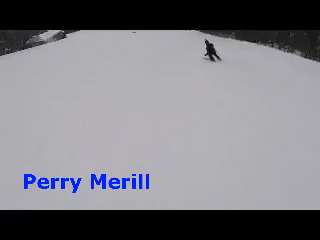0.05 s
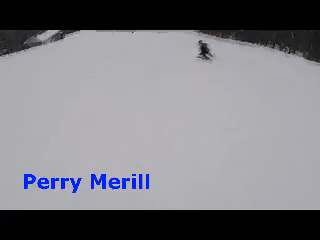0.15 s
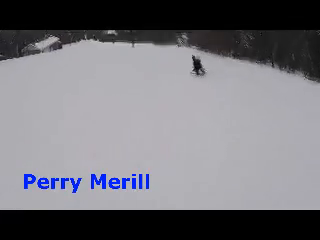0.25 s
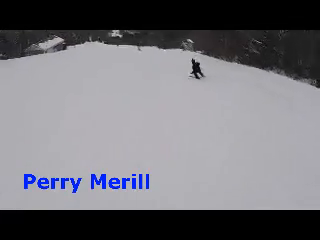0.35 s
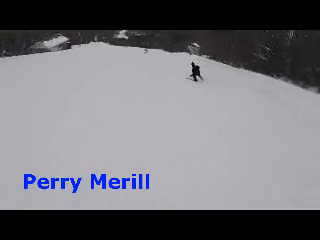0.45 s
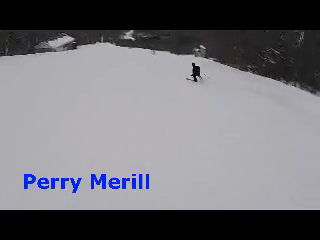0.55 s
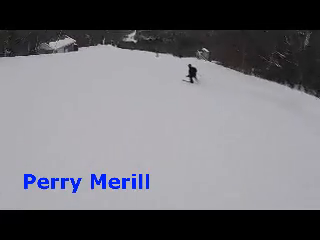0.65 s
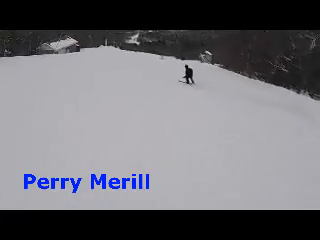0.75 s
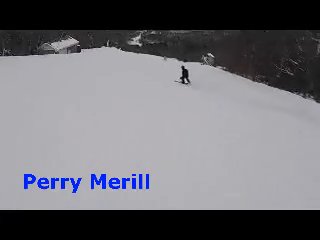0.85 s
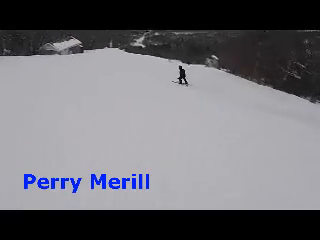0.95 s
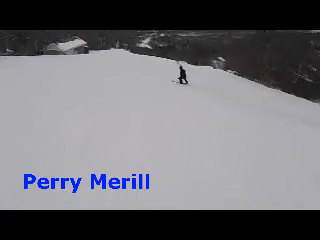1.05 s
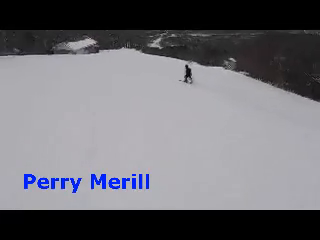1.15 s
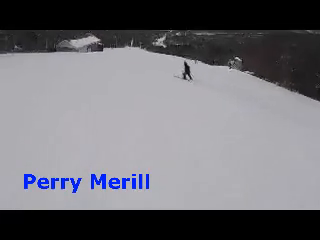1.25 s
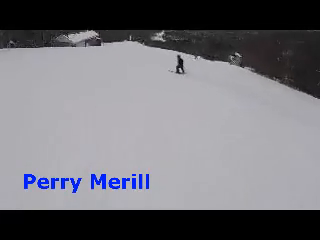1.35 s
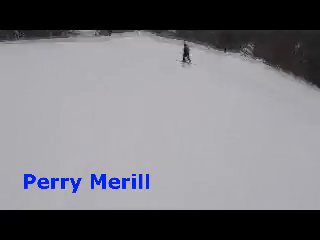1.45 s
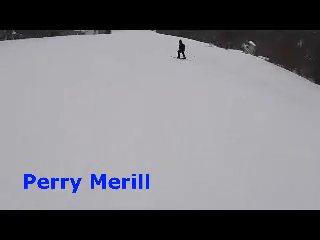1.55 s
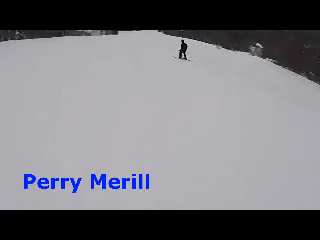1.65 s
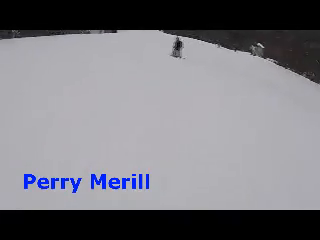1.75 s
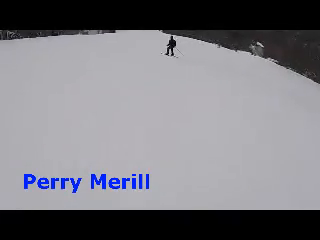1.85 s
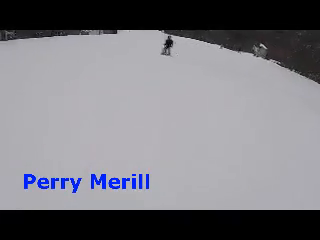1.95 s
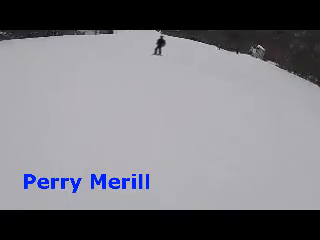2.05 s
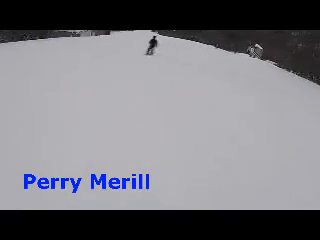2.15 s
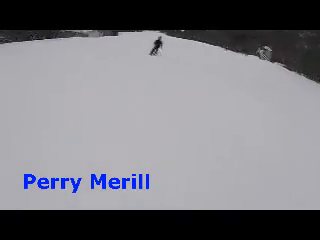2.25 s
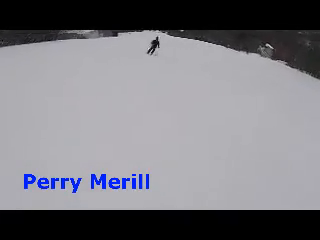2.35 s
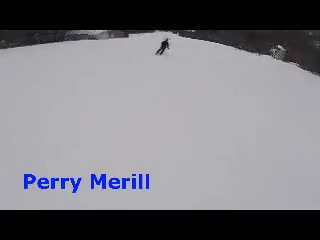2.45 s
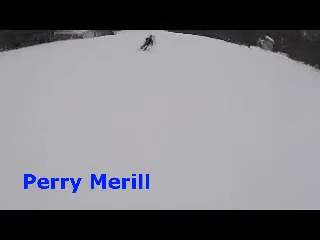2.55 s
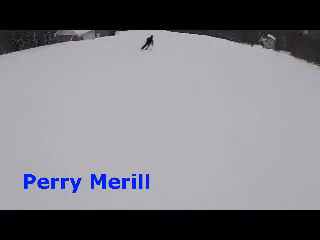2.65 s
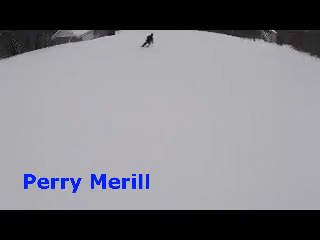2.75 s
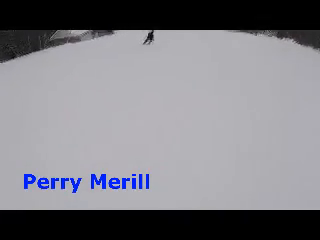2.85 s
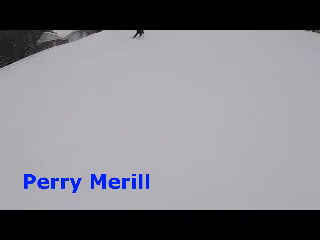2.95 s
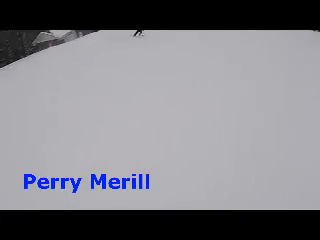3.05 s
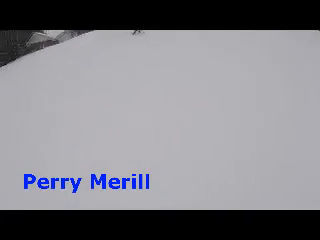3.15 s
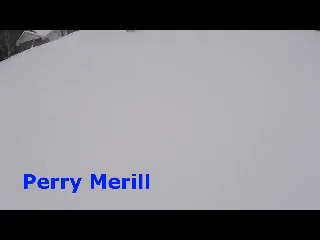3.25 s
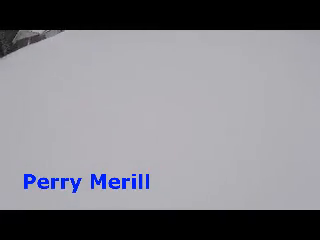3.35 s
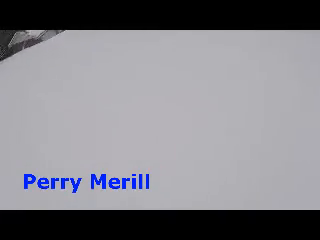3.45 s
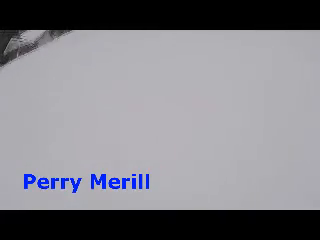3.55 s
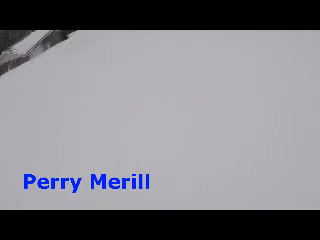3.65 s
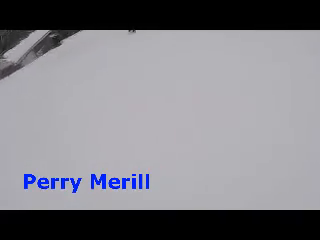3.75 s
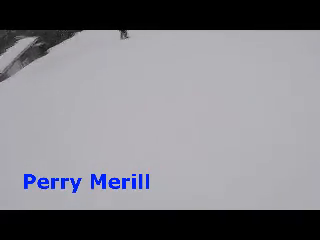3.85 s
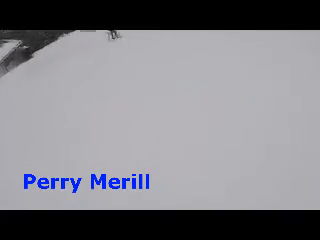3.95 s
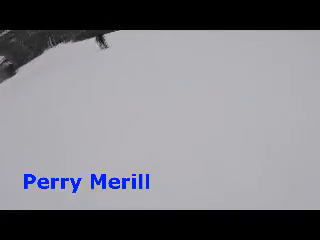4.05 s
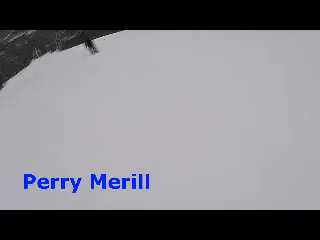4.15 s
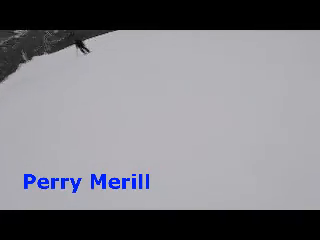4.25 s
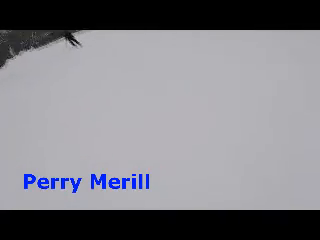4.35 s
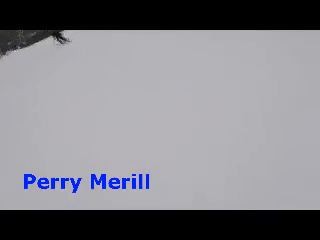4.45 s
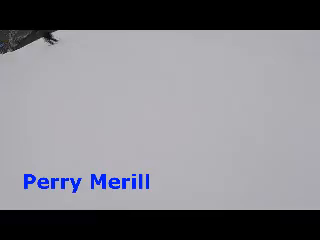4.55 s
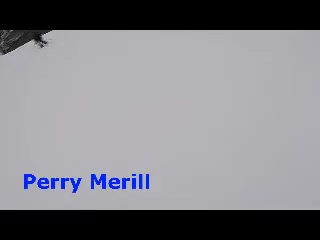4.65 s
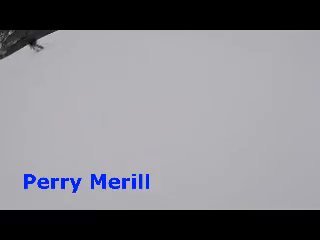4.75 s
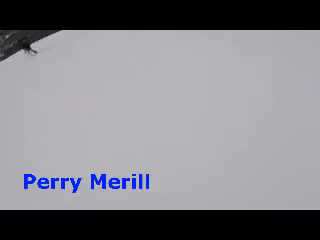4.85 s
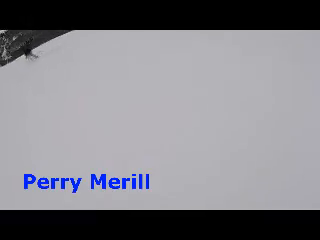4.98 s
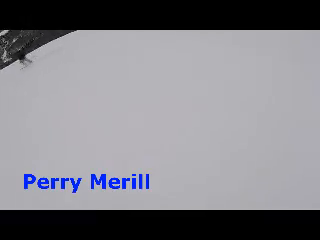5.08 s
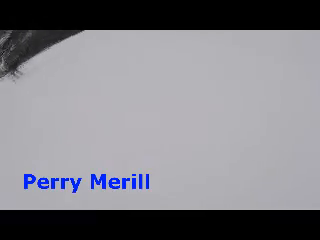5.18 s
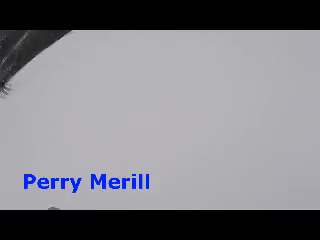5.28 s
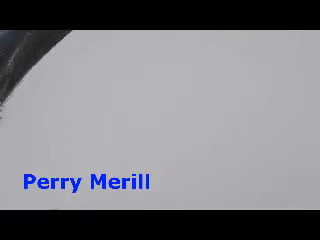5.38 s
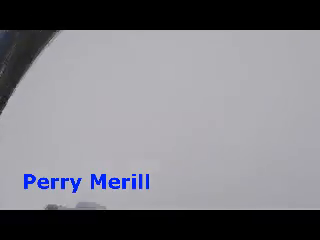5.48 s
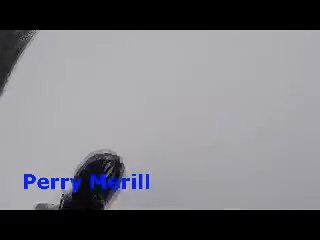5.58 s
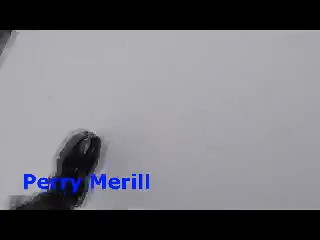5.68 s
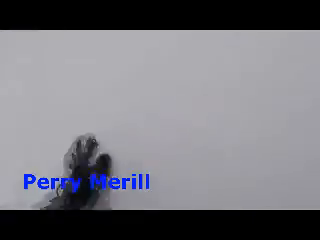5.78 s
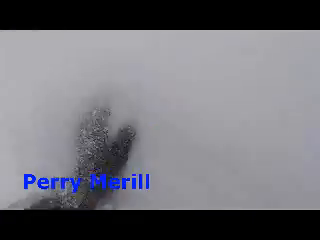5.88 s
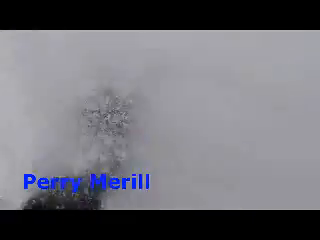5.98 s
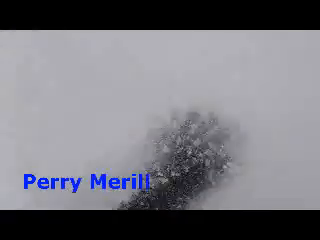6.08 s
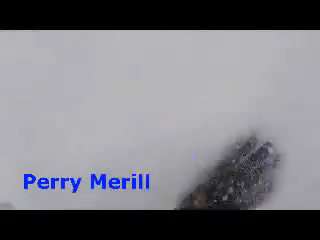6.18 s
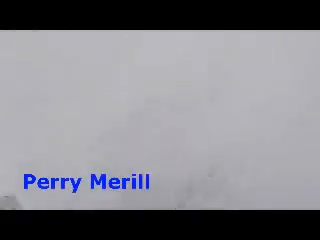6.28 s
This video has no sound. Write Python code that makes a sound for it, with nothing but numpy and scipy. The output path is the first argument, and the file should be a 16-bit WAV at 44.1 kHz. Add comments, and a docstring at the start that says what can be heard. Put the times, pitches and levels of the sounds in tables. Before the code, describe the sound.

A close microphone in a plastic case moves down an open snow slope. From the start, low gusts of wind buffet it in soft, bassy lumps, strong around 0.4-0.7, 1.4 and 2.3 seconds, with a faint airy rush. Beneath, skis thrum and crush grainy snow quietly; scraping swells near 0.4, 1.1 and 2.2 seconds. Small clumps tap the case now and then, clustered around 2.5-3.4. From 3.5 the scraping firms up, surging at 4.15 and 4.7, with more rushing air. A dull knock comes at 5.1, then the edges bite hard from 5.3 to 5.7, rough and hissing. At about 5.9 snow clumps start striking sharply; from 5.95 to 6.2 a dense volley of plasticky knocks, crunches and cracks overloads the microphone amid bright powder patter and ticking crumbs. It thins to scraping, wind and last weak taps by 6.3.

```python
"""Skiing down a groomed slope, heard by a microphone in a plastic case.
From the start, low noise in gusts is wind buffeting the case, with air rushing past above it. Random grains
in bands from thrum to fizz are skis crushing snow; turns swell their scraping and hissing, mostly harder later.
Single clumps of snow tap the case and make its resonances ring. At the end a hard turn throws up a spray:
powder patters, crumbs tick, and a volley of clumps overloads the microphone."""
import sys
import numpy as np
from scipy import signal
from scipy.fft import rfft, irfft, next_fast_len
from scipy.io import wavfile
from scipy.ndimage import uniform_filter1d

SR = 44100
rng = np.random.default_rng(int(sys.argv[2]) if len(sys.argv) > 2 else 0)


def digitize_waveform(pressure):
    """Quantize a signal to 16-bit integers and store it at the path in sys.argv[1].

    Rows of a 2-D input are taken as channels; values are limited to [-1, 1].
    """
    field = np.atleast_2d(pressure).T
    bounded = np.clip(field, -1, 1)
    quanta = np.round(bounded * 32767).astype(np.int16)
    wavfile.write(sys.argv[1], SR, quanta)


N = 278712   # samples, about 6.3 s

# Resonances of the case, from its ringing panel to the sharp crack of its corners: f/Hz, width/Hz, level/dB
PANEL = [(1367, 99, 8.5), (1600, 390, -3.5)]
CRUNCH = [(1630, 380, 7), (2360, 410, 2.6), (2648, 173, 5.3), (3030, 340, 0.64)]
CRACK = [(3776, 185, 6.5), (4610, 150, -2.5), (5040, 180, -5.5), (6310, 300, -11.5), (7450, 1400, -16.5)]


def from_db(db):
    """Decibels to amplitude gain."""
    return 10 ** (np.asarray(db) / 20)


def rms_one(x):
    """Scale to unit rms."""
    return x / np.sqrt(np.mean(x ** 2) + 1e-20)


def in_time(rows):
    """Interpolate each column of a curve over t/s, sample by sample."""
    s, *columns = np.transpose(rows)
    return [np.interp(np.arange(N) / SR, s, column) for column in columns]


def drift(rate_hz):
    """Slow random wavering with a spread of 1: noise through two equal low-pass poles."""
    step = 40   # samples between points of the slow curve
    pole = np.exp(-2 * np.pi * rate_hz * step / SR)
    noise = rng.standard_normal(N // step + 2002)
    slow = signal.lfilter([1], [1, -2 * pole, pole ** 2], noise)[2000:]   # skip the filter's start
    return np.interp(np.arange(N) / step, np.arange(len(slow)), rms_one(slow))


def coloured(x, spectrum):
    """Filter a sound by a spectrum that falls away steeply past its ends; unit rms."""
    hz, db = np.transpose(spectrum)
    size = next_fast_len(N)
    octave = np.log2(np.maximum(np.fft.rfftfreq(size, 1 / SR), 1))
    octaves_outside = np.abs(octave - np.clip(octave, np.log2(hz[0]), np.log2(hz[-1])))
    gain_db = np.interp(octave, np.log2(hz), db) - 60 * octaves_outside
    return rms_one(irfft(rfft(x, size) * from_db(gain_db), size)[:N])


def resonate(x, modes):
    """Ring two-pole resonances in parallel, with alternating signs."""
    out = 0
    for k, (hz, width_hz, db) in enumerate(modes):
        r = np.exp(-np.pi * width_hz / SR)
        poles = [1, -2 * r * np.cos(2 * np.pi * hz / SR), r * r]
        gain = (-1) ** k * from_db(db) * (1 - r * r) / 2
        out = out + gain * signal.lfilter([1, 0, -1], poles, x)
    return out


def grains(per_s, spread_db, smooth):
    """Snow crystals breaking at random, of uneven size, over an even rush."""
    sizes = from_db(spread_db * np.minimum(rng.exponential(1, N), 4))
    signed = sizes * rng.choice([-1, 1], N)
    breaks = rng.random(N) < per_s / SR
    return rms_one(signed * breaks) + smooth * rng.standard_normal(N)


def swell(s, rise_s, fall_s):
    """A smooth bell-shaped rise to 1 at time s, and a smooth fall."""
    t = np.arange(N) / SR - s
    return np.exp(-(t / np.where(t < 0, rise_s, fall_s)) ** 2)


def with_swells(base, swells):
    """Level in dB of a steady curve with swells (s, dB, rise s, fall s) added in power."""
    base_db, = in_time(base)
    power = from_db(base_db) ** 2
    for s, db, rise_s, fall_s in swells:
        power = power + (from_db(db) * swell(s, rise_s, fall_s)) ** 2
    return 10 * np.log10(power)


def wind():
    """Large eddies press on the case in low lumps; smaller ones rush past above them."""
    # Steady buffeting of the case, before wavering and trim: t/s, level/dB
    breeze = [(0, -41), (.15, -36), (.55, -37), (.95, -34.5), (1.5, -38.5), (1.75, -42.5), (2.1, -36),
              (2.35, -37.5), (2.95, -38), (3.08, -45.5), (3.25, -36.5), (3.65, -41), (4.1, -36.5),
              (4.7, -41), (5.45, -33), (6.32, -35)]
    # Single gusts on top of it: t/s, level/dB
    gusts = [(.33, -34), (.42, -28), (.65, -28), (.81, -33), (1.2, -33.5), (1.33, -31), (1.44, -28.5),
             (2.258, -27), (4.19, -30), (4.42, -36), (5.33, -30), (5.59, -29), (5.96, -26), (6.05, -26),
             (6.12, -28.5)]
    # Air rushing past with the speed of the run, before trim: t/s, level/dB
    airstream = [(0, -53.5), (1.1, -48), (1.45, -46), (1.85, -51), (2.48, -46.5), (2.85, -52),
                 (3.12, -43.5), (3.4, -46), (3.75, -43), (4.5, -43), (4.8, -37.5), (5.03, -40.5),
                 (5.17, -50), (5.41, -34.5), (5.78, -46.5), (6.06, -32), (6.32, -66)]
    # Spectra of the buffeting and of the rush: f/Hz, relative density/dB
    buffet_spectrum = [(8.8, -40), (15, 0.5), (56, 3), (98, -8), (130, -37.5), (220, -120)]
    rush_spectrum = [(66, -31), (112, 4), (162, -2), (245, -6.5), (320, -20), (540, -120)]
    gust_rise_s, gust_fall_s = 0.046, 0.038

    buffet_db = with_swells(breeze, [(s, db, gust_rise_s, gust_fall_s) for s, db in gusts])
    eddies = coloured(rng.standard_normal(N), buffet_spectrum)
    strength = np.sqrt(uniform_filter1d(eddies ** 2, size=4000))
    steady_eddies = eddies / strength   # evened out, so that the gusts set the level
    buffet = from_db(buffet_db + 0.38 + 1.4 * drift(18)) * steady_eddies

    rush_db, = in_time(airstream)
    rush = from_db(rush_db - 0.57) * coloured(rng.standard_normal(N), rush_spectrum)
    return buffet + rush


def skis():
    """The boards thrum while base and edges crush the snow; a shared chatter wavers their scraping."""
    # The skis running flat between turns, before trim and wavering: t/s, scrape level/dB
    glide = [(0, -55.5), (.8, -47.5), (1.3, -50), (1.75, -53.5), (2.4, -49), (2.85, -52.5), (3.25, -46),
             (3.85, -45.5), (4.4, -40.5), (4.88, -40), (5.05, -45), (5.58, -40), (5.83, -48), (6.32, -46)]
    # Pushes on the edges, each a swell of scraping: peak t/s, scrape level/dB, rise/s, fall/s
    turns = [(.39, -48.5, 0.09, 0.43), (1.12, -43.5, 0.21, .12), (2.21, -49, 0.25, 0.084),
             (2.47, -54, 0.068, 0.052), (2.95, -49.5, .04, 0.047), (3.51, -43, 0.042, 0.076),
             (4.15, -36.5, 0.096, 0.07), (4.689, -34.5, 0.065, 0.093), (5.33, -30, 0.089, .07),
             (5.469, -29, 0.12, 0.074), (5.67, -29, 0.043, 0.057), (5.879, -33.5, 0.02, 0.046),
             (6.15, -31.5, 0.25, .12)]
    # Tone from soft powder to hard-packed snow, before trim, over the scrape:
    # t/s, thrum/dB, edge bite/dB, powder hiss/dB
    snow = [(0, 3, -8, 1.5), (.45, 0.5, -22.5, 1), (1.15, -0.5, -14.5, -1), (1.8, 3.5, -10, -0.5),
            (2.3, 3.5, -13, -2), (2.9, 0, -2, 2.5), (3.25, -3, -12, -9), (3.5, -0.5, -9, -3.5),
            (3.75, -0.5, -9.5, -9.5), (4.35, -1.5, -6, -5.5), (4.98, 1, -6.5, -7.5), (5.35, -2.5, -2, -2.5),
            (5.7, -2.5, -3, -2), (6.32, -10, -4.5, -4)]
    # Spectra of the layers, from the boards up to the finest crystals: f/Hz, relative density/dB
    thrum_spectrum = [(140, -32), (235, -3), (326, 0.5), (450, -5), (511, -4), (592, -6), (689, -6),
                      (835, -2), (950, -16.5), (1240, -45), (2090, -120)]
    scrape_spectrum = [(550, -38), (930, -9.5), (1060, -4), (1160, -6), (1340, -1), (1450, -2),
                       (1580, -4.5), (1800, -11.5), (2340, -24), (3960, -120)]
    bite_spectrum = [(940, -34), (1600, -0.5), (1880, 0.5), (2210, 3.5), (2390, -2.5), (2640, -0.5),
                     (2800, -23), (3640, -43), (6160, -120)]
    hiss_spectrum = [(1470, -34), (2500, -3.5), (2640, 1.5), (2870, 0.5), (3050, 2.5), (3350, -5),
                     (3640, 1.5), (3860, -6.5), (4160, -12.5), (4450, -11.5), (5100, -19.5), (5700, -42.5),
                     (11600, -120)]
    fizz_spectrum = [(4800, -46), (5700, -12), (6350, 4.5), (6750, 1.5), (7500, -5), (8400, -7),
                     (9400, -31.5), (12000, -73.5)]
    # The skis flexing under a hard turn: f/Hz, width/Hz, level/dB
    flex = [(301, 85, 0)]

    scrape_db = with_swells(glide, turns)
    thrum_db, bite_db, hiss_db = in_time(snow)
    chatter_db = 1.25 * drift(30)

    def rubbing(level_db, source, spectrum):
        """One layer of the scraping, wavering on its own over uneven snow."""
        return from_db(level_db + 0.5 * drift(27)) * coloured(source, spectrum)

    thrum = rubbing(scrape_db + thrum_db - 0.6 + 0.45 * chatter_db,
                    grains(per_s=700, spread_db=1.5, smooth=0.61), thrum_spectrum)
    scrape = rubbing(scrape_db - 0.2 + chatter_db,
                     grains(per_s=2400, spread_db=2.0, smooth=1.0), scrape_spectrum)
    bite = rubbing(scrape_db + bite_db + 0.3 + chatter_db,
                   grains(per_s=3000, spread_db=6.0, smooth=0.94), bite_spectrum)
    hiss = rubbing(scrape_db + hiss_db + 0.2 + chatter_db,
                   grains(per_s=5000, spread_db=2.0, smooth=0.69), hiss_spectrum)

    flexing = resonate(resonate(rng.standard_normal(N), flex), flex)
    judder_db = 2.5 + 1.4 * scrape_db   # swings wider than the scrape
    judder = from_db(judder_db) * rms_one(flexing)

    # the finest crystals always fizz a little, and more when the edge bites into powder
    fizz_floor_db = -78.5
    fizz_db = -34.5 + 0.7 * (scrape_db + bite_db + hiss_db) + chatter_db
    fizz_gain = np.hypot(from_db(fizz_floor_db), from_db(fizz_db))
    fizz = fizz_gain * coloured(rng.standard_normal(N), fizz_spectrum)
    return thrum + judder + scrape + bite + hiss + fizz


def spray():
    """Fine snow patters on the case, in flurries, while the turn throws it up; small crumbs tick among it."""
    # Spectrum of the fine snow: f/Hz, relative density/dB
    powder_spectrum = [(1470, -32), (2500, -26), (2730, -21), (3210, -25), (3760, -29), (4220, -9),
                       (4610, -4.5), (5520, -9), (7840, -10), (11500, -12), (15000, -59), (22000, -120)]
    powder_db = -29 + 2.0 * drift(43)
    patter = grains(per_s=4500, spread_db=4.0, smooth=0.98)
    powder = from_db(powder_db) * coloured(patter, powder_spectrum)
    ticks = resonate(grains(per_s=54, spread_db=6, smooth=0), [*PANEL, *CRUNCH, *CRACK])
    crumbs = from_db(-23) * rms_one(ticks)
    return swell(6.05, rise_s=0.071, fall_s=0.13) * (powder + crumbs)


def clumps(size=2600):
    """Each lump taps and crumbles, ringing the case: heavy ones knock, hard ones crunch and crack."""
    # Lumps of snow striking the case: t/s, level before trim/dB, crumbling scale/s, weight/dB, hardness/dB
    strikes = [(.051, -38, 0.0014, -1, -13), (.3695, -35.5, 0.0046, -3, -16), (1.446, -45, .006, 3, 3),
               (1.614, -30.5, 0.0032, -10, -14), (2.126, -44.5, 0.0034, -10, 14),
               (2.472, -39.5, 0.008, 4, -16), (2.532, -35, 0.0017, -13, -2), (2.649, -30, 0.0017, -2, -11),
               (2.729, -39, 0.0032, -6, -18), (2.757, -33.5, 0.0011, 2, -13), (2.955, -36, .0013, -4, -4),
               (3.123, -39, 0.0032, -9, -5), (3.183, -36.5, 0.0021, -20, -11),
               (3.367, -38.5, 0.0055, 6, -24), (5.1, -24, 0.0081, 1.5, -24), (5.259, -29.5, 0.012, -5, -5),
               (5.616, -30, 0.015, 1, -5), (5.732, -22.5, .005, -9, -11.5), (5.758, -30, 0.0077, 1.5, -6.5),
               (5.782, -31, 0.0054, -15, -5), (5.792, -25, .004, -23.5, -40),
               (5.8025, -18.5, 0.0032, -14, -48), (5.856, -30, 0.0037, 1, -18),
               (5.871, -22.5, .003, -9, -33), (5.888, -10.5, 0.00024, -2, 16),
               (5.9, -22.5, 0.0025, -20, -10), (5.946, -10.5, 0.0034, -12, -3),
               (5.968, -10.5, 0.0072, 10.5, 11.5), (5.981, -3.5, 0.0011, -8, 16),
               (5.992, -2.5, 0.0122, -7.5, 4), (6.013, -19.5, .003, -20, 3), (6.02, 3, 0.00065, -15, -4),
               (6.027, 2, 0.0014, -33, -2), (6.033, 1, .009, -16.5, -5.5), (6.064, -2.5, 0.0016, -10, 2),
               (6.069, -6, 0.00078, -25, -17), (6.074, -17, .002, -3, -6), (6.096, -6.5, 0.0017, -4, 5),
               (6.105, -13.5, 0.00082, -19, 6), (6.115, -3, 0.0072, -9, -2),
               (6.129, -12.5, 0.0036, -13, -23), (6.134, -6, 0.0039, -3, 22), (6.183, -24, 0.0042, -18, -5),
               (6.19, -5, 0.0049, -17, 0), (6.2117, -9.5, 0.0011, -29, -4.5), (6.253, -16, 0.0014, -25, -8),
               (6.2847, -22.5, 0.0028, -22, -13)]
    # Resonances of the case knocking, and of the whole case jolting on its mount: f/Hz, width/Hz, level/dB
    knock = [(400, 200, -6.5), (537, 155, -2), (800, 195, 2), (1090, 400, -1.5)]
    thump = [(191, 110, 0)]

    out, t = np.zeros(N + size), np.arange(size) / SR
    for s, level_db, crumbling_s, weight_db, hardness_db in strikes:
        # held while it crumbles, then a fast fall, over a weak longer tail
        body = np.exp(-np.maximum(t - 0.684 * crumbling_s, 0) / 0.00058)
        tail = 0.097 * np.exp(-t / 0.011)
        force = rng.standard_normal(size) * (body + tail)
        force[0] += 4.0   # the first touch

        # weak lumps and soft lumps make a longer, duller contact
        strength_hz = 3400 + 9000 * np.sqrt(from_db(level_db))
        hardness_hz = 2000 + 11000 * np.sqrt(from_db(hardness_db))
        contact_hz = min(strength_hz, hardness_hz)
        force = signal.sosfilt(signal.butter(4, contact_hz, fs=SR, output="sos"), force)

        # each group of resonances against the panel's ring, then scaled to a total power of 1
        groups = (PANEL, knock, CRUNCH, CRACK, thump)
        shares = from_db([0, -1 + weight_db, 3 + 0.64 * hardness_db, -1 + hardness_db, -19])
        shares = shares / np.linalg.norm(shares)
        ring = sum(share * rms_one(resonate(force, modes)) for share, modes in zip(shares, groups))

        # longer crumbling carries more energy
        loudness = from_db(level_db + 3.0) * np.sqrt((crumbling_s + 0.0003) * SR / size)
        start = int(s * SR)
        out[start:start + size] += loudness * rms_one(ring)
    return out[:N]


def scene():
    """Everything as it reaches the one microphone inside the case."""
    return (wind() + skis() + spray() + clumps())[None]


def record(dry):
    """The microphone overloads smoothly on the hardest knocks; the top rolls off and is cut."""
    ceiling = 0.88   # of full scale
    clipped = dry / (1 + (dry / ceiling) ** 6) ** (1 / 6)
    # each filter runs forward and back, which doubles its loss
    dulled = signal.sosfiltfilt(signal.butter(3, 10500, fs=SR, output="sos"), clipped)
    return signal.sosfiltfilt(signal.ellip(8, 0.05, 70, 12300, fs=SR, output="sos"), dulled)


dry = scene()
out = record(dry)
digitize_waveform(out)
```